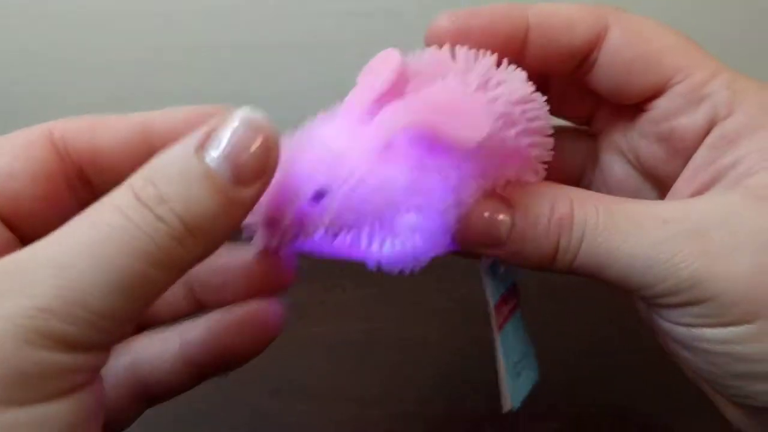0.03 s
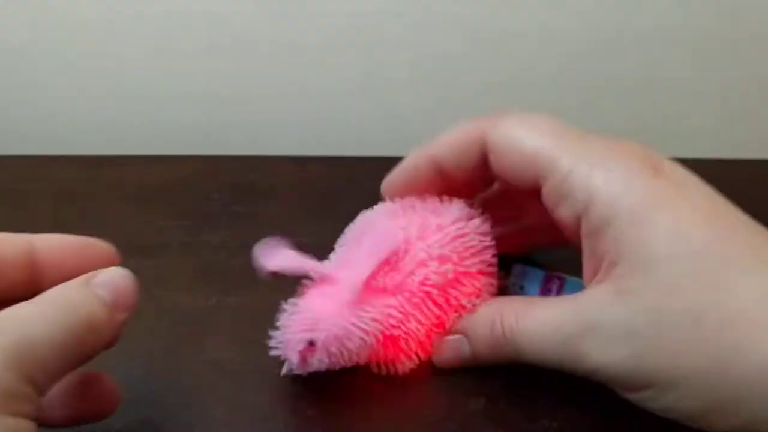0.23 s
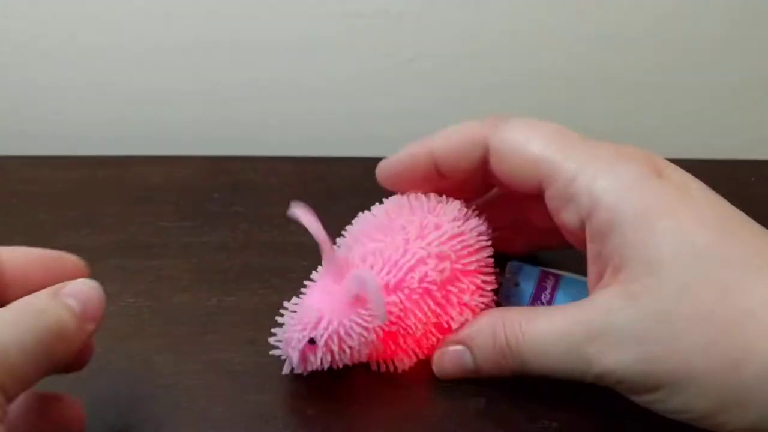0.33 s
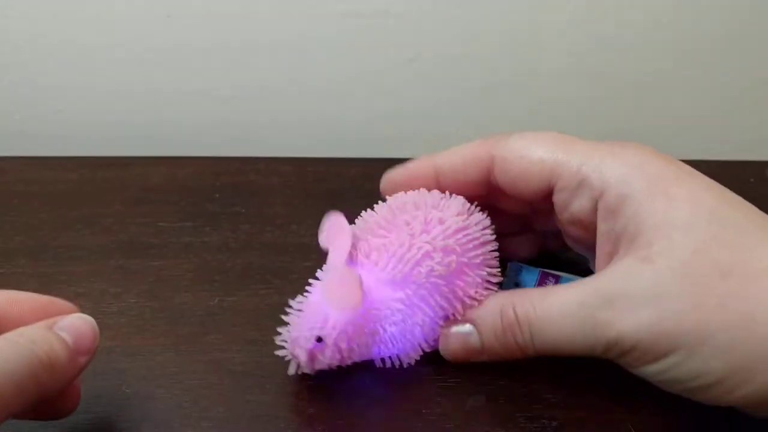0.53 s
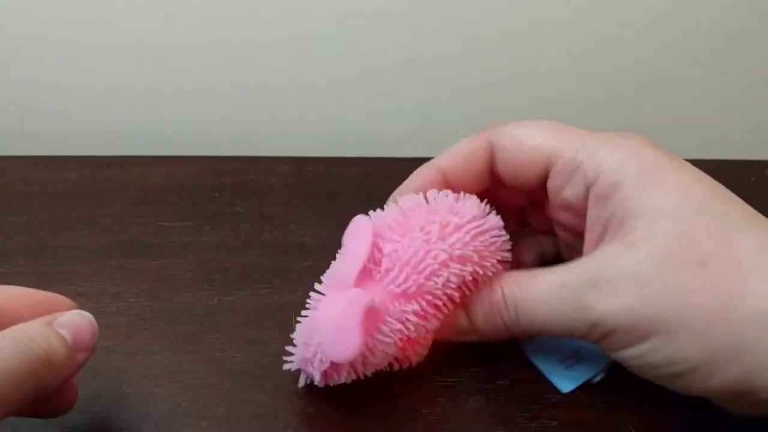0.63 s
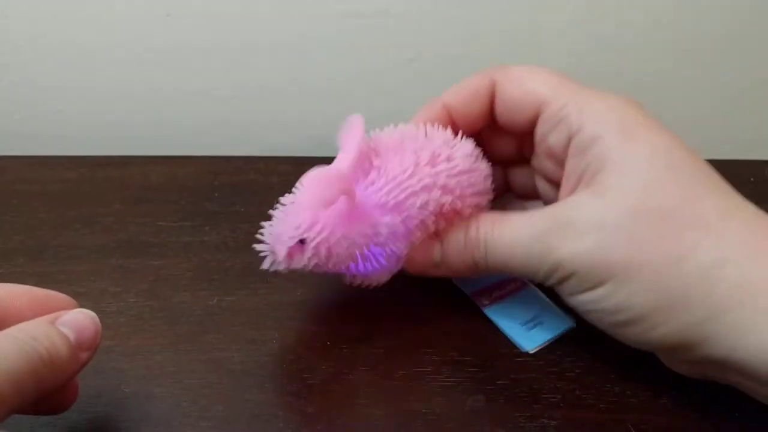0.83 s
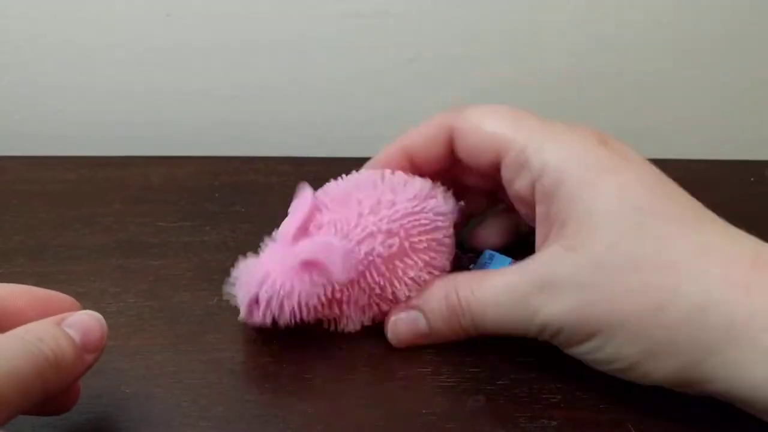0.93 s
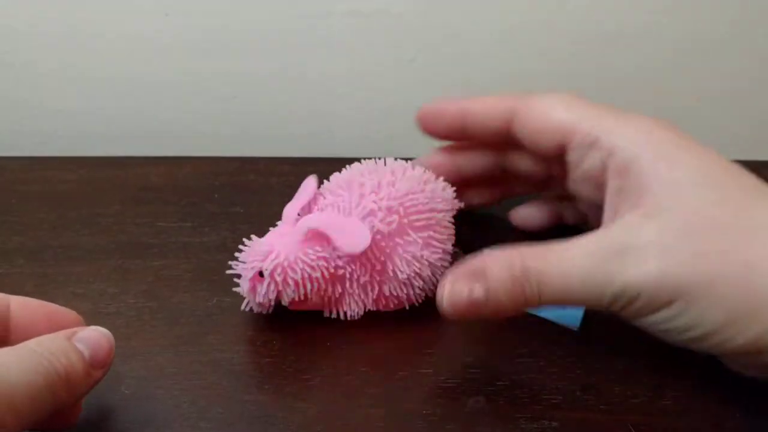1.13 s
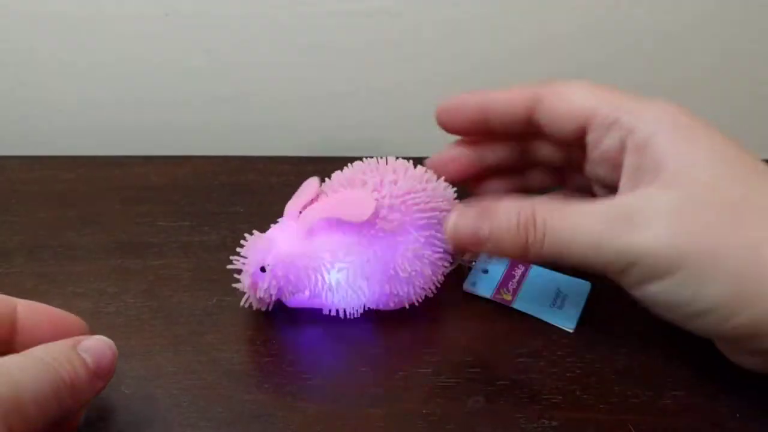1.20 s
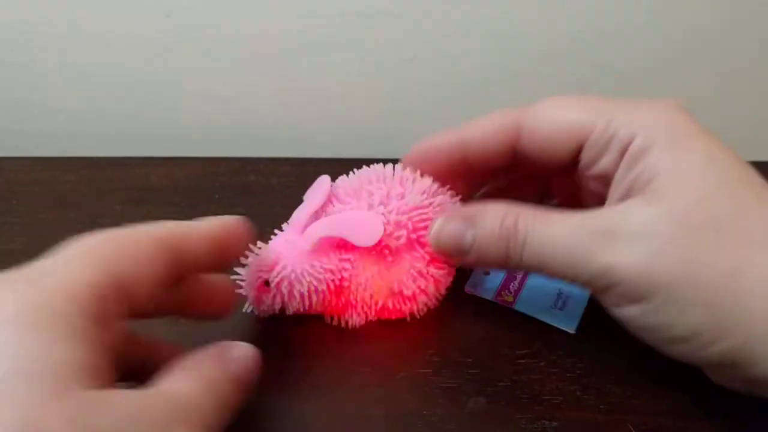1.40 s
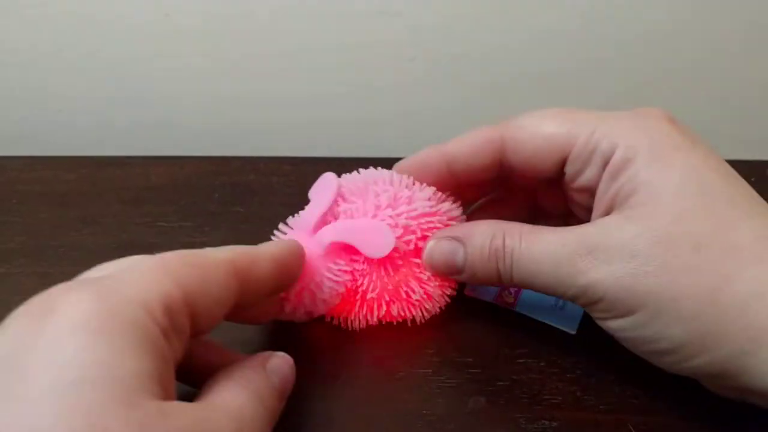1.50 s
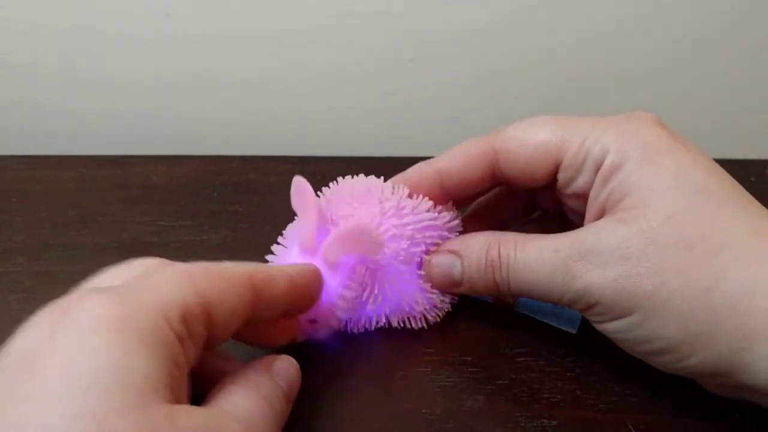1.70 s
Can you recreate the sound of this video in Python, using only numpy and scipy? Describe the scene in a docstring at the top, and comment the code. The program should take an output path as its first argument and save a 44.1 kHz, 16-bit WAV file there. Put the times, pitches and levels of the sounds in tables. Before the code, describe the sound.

A soft rubber toy thuds onto a wooden table at about 0.2 seconds, its card tag ticking. It scrapes briefly over the wood from 0.3 to 0.5 seconds, with small clicks. Its spines rustle softly under fingers throughout. A lighter knock comes at 0.9 seconds and a last tap at 1.3, as a hand brushes the table. The sound is close, over a faint low hum and hiss.

```python
"""A soft spiny rubber toy lands on a wooden table, close by: the table thuds, the card tag ticks.
From 0.3 s it is shoved, sticking and slipping on the wood. Squeezed and touched, its spines flick
free and rustle under the fingers; at 0.8 s it tips and scuffs, then knocks the table again.
From 1.2 s the hand shifts on the wood, with a last tap and a few soft strokes.
A low hum and a faint hiss lie behind throughout; small quiet room, mono."""
import sys
import numpy as np
from scipy import signal
from scipy.fft import rfft, irfft
from scipy.io import wavfile

SR = 44100
rng = np.random.default_rng(int(sys.argv[2]) if len(sys.argv) > 2 else 0)


def to_wav(s):
    """Save 16-bit WAV."""
    ch = np.atleast_2d(s).T  # columns
    pcm = np.round(np.clip(ch, -1, 1) * 32767)  # PCM
    wavfile.write(sys.argv[1], SR, pcm.astype(np.int16))


N = 77175
TIME_S = np.arange(N) / SR


# Landing, rebound, taps: (time [s], impulse level [dB], low edge [Hz], high edge [Hz])
CONTACTS = [(0.2079, -26, 10, 1700), (0.2521, -47, 10, 400), (0.4155, -51, 200, 900),
            (0.812, -61, 500, 1000), (0.9328, -42, 120, 480), (0.9520, -54, 10, 350),
            (1.3392, -39, 300, 1100)]
# Table loaded by the toy: (frequency [Hz], gain [dB], t60 [s])
TABLE_MODES = [(153.5, 2.5, .145), (205, 7, .045), (250, -.6, .025), (366, -9, .12), (480, -21, .06),
               (562, -17, .07), (655, -16, .08), (772, -19, .045), (1062, -17, .05), (1388, -19, .05),
               (1670, -26, .05)]
# Dead knock of the contact: (frequency [Hz], gain [dB], t60 [s])
KNOCK_MODES = [(386, 0, 0.01), (746, 4.5, 0.011), (1090, 3, 0.0042)]
SWAY_HZ, SWAY_DB, SWAY_T60_S = 90.2, -5.5, 0.096

def thuds():
    """Soft contacts push the table, which rings, knocks and sways on its legs with a faint boom."""
    push = np.zeros(N)
    for time_s, level_db, low_hz, high_hz in CONTACTS:
        impulse = from_db(level_db) * signal.unit_impulse(N, int(time_s * SR))
        push += cut(cut(impulse, high_hz, "low"), low_hz, "high", order=1)
    boom = ring(push, [(SWAY_HZ, SWAY_DB, SWAY_T60_S)])
    return ring(push, TABLE_MODES) - ring(push, KNOCK_MODES) + boom


# Tag and nail ticks: (time [s], level [dB], high edge [Hz], 20 dB decay [s], tag drive [dB])
TICK_HITS = [(0.177, -34.5, 16100, 0.0016, -18), (0.1904, -48.5, 14100, 0.017, -36),
             (0.207, -32, 12900, 0.0016, -39), (0.2087, -23, 19100, 0.00082, -60),
             (0.211, -37, 11100, 0.0042, -38), (0.235, -44, 13000, 0.0026, -33),
             (0.381, -44.5, 5500, 0.0036, -31), (0.4019, -36.5, 9500, .003, -35),
             (0.4149, -37, 9500, .004, -35), (0.4228, -39, 9500, .005, -34),
             (0.5023, -48, 2000, 0.0025, -46), (0.57, -49.5, 2500, 0.004, -45),
             (0.8350, -55.5, 2520, 0.0036, -20), (0.9685, -45, 1490, 0.0056, -32),
             (1.027, -48.5, 4000, .004, -39), (1.108, -43, 4000, 0.0012, -37),
             (1.3393, -39, 6860, 0.0038, -39)]
# Card tag: (frequency [Hz], gain [dB], t60 [s])
TAG_MODES = [(1990, 3, .009), (3030, 5, .008), (3950, -3, .005), (6400, 8, .004), (9850, 3, .004)]
TICK_LOW_HZ, SNAP_DB = 2000, 3

def ticks():
    """Tag and fingernails strike: a snap and a brief crunch, both ringing the tag."""
    direct, tag_drive = np.zeros(N), np.zeros(N)
    for time_s, level_db, high_hz, decay_s, drive_db in TICK_HITS:
        envelope = (TIME_S >= time_s) * 10 ** (-np.abs(TIME_S - time_s) / decay_s)
        crunch = envelope * rng.choice([-1, 1], N)
        snap = from_db(SNAP_DB) * signal.unit_impulse(N, int(time_s * SR))
        bandwidth_gain = np.sqrt(SR / 2 / high_hz)
        tick = from_db(level_db) * cut(snap + crunch, high_hz, "low") * bandwidth_gain
        direct += tick
        tag_drive += from_db(drive_db) * tick
    return cut(direct + ring(tag_drive, TAG_MODES), TICK_LOW_HZ, "high", order=1)


# Spines brushing skin and wood: (peak time [s], rise sigma [s], fall sigma [s], level [dB],
# low edge [Hz], high edge [Hz], resonance [Hz], resonance gain [dB])
SPINE_STROKES = [(0.225, 0.054, 0.072, -58, 2380, 16100, 9860, -6),
                 (0.442, 0.059, 0.048, -59.5, 2560, 15400, 6160, -14),
                 (0.61, 0.051, 0.068, -58, 1950, 17900, 5600, -14),
                 (0.672, .024, 0.016, -51.5, 2750, 7960, 4360, -3),
                 (0.68, 0.03, 0.042, -53.5, 3870, 18800, 6600, -18),
                 (0.804, 0.051, 0.034, -51.5, 4400, 18700, 8500, -18),
                 (0.868, 0.014, .016, -55, 6900, 18800, 14200, -17),
                 (0.984, 0.038, 0.1, -55.5, 2530, 15800, 2914, -14.5),
                 (1.061, 0.028, 0.035, -56, 1270, 7560, 3820, -4),
                 (1.115, 0.064, 0.082, -55.5, 4200, 18800, 8200, -24.5),
                 (1.321, 0.03, .02, -60, 2450, 13600, 3600, -14),
                 (1.433, 0.056, 0.064, -56, 3170, 18000, 4670, -17),
                 (1.52, 0.32, 0.13, -64, 870, 2980, 1700, -3.5)]
# Spine flick spectrum: (frequency [Hz], relative density [dB])
SPINE_SPECTRUM = [(500, 14.5), (1500, 6), (2400, 2.5), (3000, 4.5), (3500, 1.5), (4400, 4), (5300, -0.5),
                  (6500, 0), (9000, -0.5), (10800, -1.5), (14000, 4), (16000, 0)]
SPINES_PER_S, SPINE_SPREAD_DB, SPINE_T60_CYCLES = 11000, 2.8, 55
FLUTTER_DB, FLUTTER_HZ = 1.34, 45

def spine_rustle():
    """Rubber spines flick free in swelling, fluttering strokes, each with a faint resonance."""
    strokes = np.zeros(N)
    for peak_s, rise_s, fall_s, level_db, low_hz, high_hz, ring_hz, ring_db in SPINE_STROKES:
        sigma_s = np.where(TIME_S < peak_s, rise_s, fall_s)
        swell = np.exp(-((TIME_S - peak_s) / sigma_s) ** 2 / 2)
        flicks = coloured(grains(SPINES_PER_S, SPINE_SPREAD_DB), SPINE_SPECTRUM)
        hiss = unit_rms(cut(cut(flicks, low_hz, "high"), high_hz, "low"))
        mode = (ring_hz, 0, SPINE_T60_CYCLES / ring_hz)
        resonance = unit_rms(ring(np.diff(flicks, prepend=0), [mode]))
        strokes += from_db(level_db) * swell * unit_rms(hiss + from_db(ring_db) * resonance)
    return strokes * from_db(FLUTTER_DB * drift(FLUTTER_HZ))


# Toy shoved over the wood: (time [s], level [dB])
SHOVE_LEVELS = [(0.27, -87), (0.29, -52.5), (0.315, -73), (0.345, -51.5), (0.385, -49), (0.431, -47),
                (0.454, -76), (0.50, -85)]
# Toy scuffing as it tips: (time [s], level [dB])
SCUFF_LEVELS = [(0.795, -66), (0.815, -59), (0.835, -58), (0.86, -96)]
# Hand shifting on the table: (time [s], level [dB])
HAND_LEVELS = [(1.18, -84), (1.25, -63), (1.40, -66.5), (1.54, -65), (1.70, -68.5)]
# Friction grit spectrum: (frequency [Hz], relative density [dB])
GRIT_SPECTRUM = [(200, -27), (340, 16.5), (550, -3), (1400, 17), (2500, 8.5), (6000, 5), (16000, -42)]
SLIPS_PER_S, SLIP_SPREAD_DB = 1300, 2

def slide(levels, murmur_low_hz, grit_db):
    """Rubber or skin sticks and slips on the wood: the table murmurs under a dry grit."""
    times_s, levels_db = np.transpose(levels)
    moving = (TIME_S > times_s[0]) * (TIME_S < times_s[-1])
    envelope = from_db(np.interp(TIME_S, times_s, levels_db)) * moving
    slips = grains(SLIPS_PER_S, SLIP_SPREAD_DB)
    murmur = unit_rms(cut(ring(slips, TABLE_MODES), murmur_low_hz, "high"))
    grit = from_db(grit_db) * coloured(slips, GRIT_SPECTRUM)
    return envelope * (murmur + grit)


ROOM_DB, ROOM_T60_S, ROOM_HIGH_HZ, ROOM_DELAY_S = -13.5, 0.24, 5700, 0.0078

def room_reverb(x):
    """Diffuse reflections add a short, dull tail."""
    envelope = np.exp(-np.log(1000) * TIME_S / ROOM_T60_S) * (TIME_S > ROOM_DELAY_S)
    tail = cut(rng.standard_normal(N), ROOM_HIGH_HZ, "low", order=1) * envelope
    tail /= np.sqrt(np.sum(tail ** 2))
    return from_db(ROOM_DB) * signal.fftconvolve(x, tail)[:N]


# Hum tones: (frequency [Hz], rms level [dB])
HUM_TONES = [(76.5, -60.5), (120, -66.5)]
# Room noise spectrum: (frequency [Hz], relative density [dB])
NOISE_SPECTRUM = [(20, -25), (40, 0.5), (60, 0), (110, -3), (170, -8.5), (260, -12.5), (500, -18.5),
                  (1000, -22.5), (2000, -27.5), (5000, -32), (10000, -31), (16000, -31.5)]
WAVER_DB, WAVER_HZ, NOISE_DB = 2, 5, -57.5

def background():
    """A low hum wavers in level over steady room noise."""
    hum = np.zeros(N)
    for hz, level_db in HUM_TONES:
        amplitude = np.sqrt(2) * from_db(level_db + WAVER_DB * drift(WAVER_HZ))
        hum += amplitude * np.sin(2 * np.pi * (hz * TIME_S + rng.random()))
    return hum + from_db(NOISE_DB) * coloured(rng.standard_normal(N), NOISE_SPECTRUM)


def from_db(db):
    """Decibels to gain."""
    return 10 ** (np.asarray(db) / 20)


def unit_rms(x):
    """Scale to rms 1."""
    return x / np.sqrt(np.mean(x ** 2) + 1e-20)


def cut(x, hz, kind, order=2):
    """Butterworth low- or high-pass."""
    sections = signal.butter(order, np.clip(hz, 10, .45 * SR), kind, fs=SR, output="sos")
    return signal.sosfilt(sections, x + 1e-18)


def coloured(x, spectrum):
    """Shape x by a spectrum interpolated in log frequency; rms 1."""
    hz, db = np.transpose(spectrum)
    bins_hz = np.maximum(np.arange(N // 2 + 1) * SR / N, 1)
    gains = from_db(np.interp(np.log(bins_hz), np.log(hz), db))
    return unit_rms(irfft(rfft(x) * gains, N))


def drift(hz):
    """Random wander below hz; rms 1."""
    return unit_rms(cut(rng.standard_normal(2 * N), hz, "low")[N:])


def ring(x, modes):
    """Decaying sines of alternating sign, driven by x."""
    ringing = np.zeros(N)
    for k, (hz, db, t60_s) in enumerate(modes):
        radius = np.exp(-np.log(1000) / (t60_s * SR))
        step_rad = 2 * np.pi * hz / SR
        feedback = [1, -2 * radius * np.cos(step_rad), radius * radius]
        ringing -= (-1) ** k * from_db(db) * signal.lfilter([0, np.sin(step_rad)], feedback, x + 1e-18)
    return ringing


def grains(per_s, spread_db):
    """Random clicks of uneven size and sign."""
    sizes = from_db(spread_db * np.minimum(rng.exponential(1, N), 5))
    signs = rng.choice([-1, 1], N)
    return sizes * signs * (rng.random(N) < per_s / SR)


def scene():
    """Handling, reverb and background, alike in both channels."""
    shove = slide(SHOVE_LEVELS, murmur_low_hz=280, grit_db=-8)
    scuff = slide(SCUFF_LEVELS, murmur_low_hz=500, grit_db=-13)
    hand = slide(HAND_LEVELS, murmur_low_hz=340, grit_db=-5.5)
    handling = thuds() + ticks() + spine_rustle() + shove + scuff + hand
    return np.tile(handling + room_reverb(handling) + background(), (2, 1))


MIC_LOW_HZ, CUTOFF_HZ = 31.4, 16100

def record(dry):
    """The microphone sheds the deepest bass; the top is cut steeply."""
    steep_lowpass = signal.ellip(10, .1, 80, CUTOFF_HZ, fs=SR, output="sos")
    return signal.sosfilt(steep_lowpass, cut(dry, MIC_LOW_HZ, "high"))


dry = scene()
out = record(dry)
to_wav(out)
```